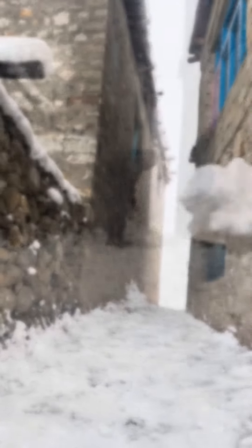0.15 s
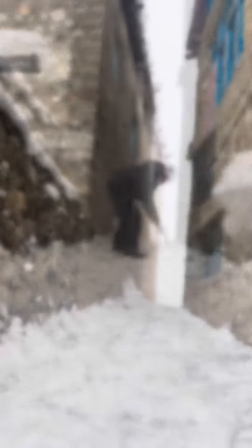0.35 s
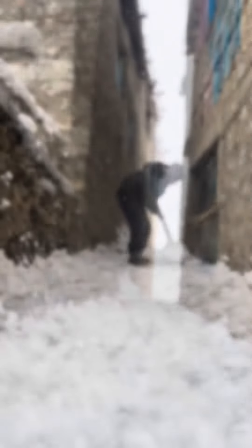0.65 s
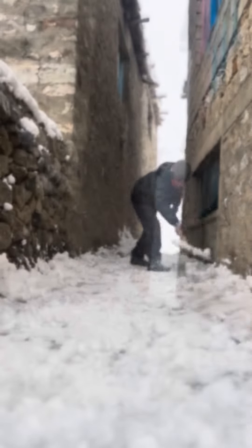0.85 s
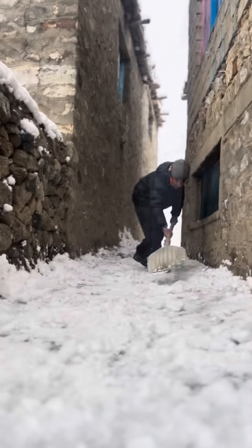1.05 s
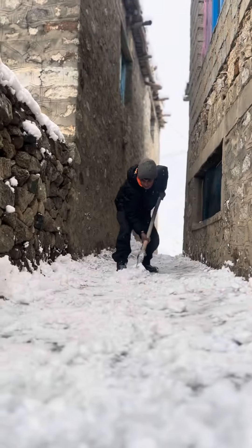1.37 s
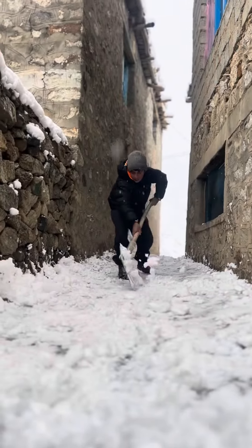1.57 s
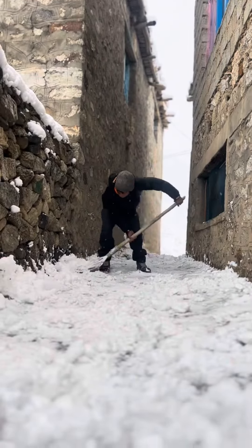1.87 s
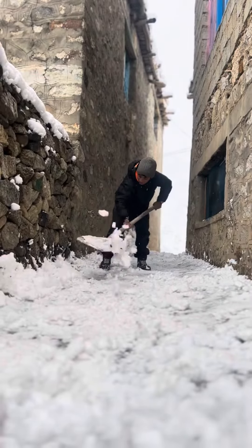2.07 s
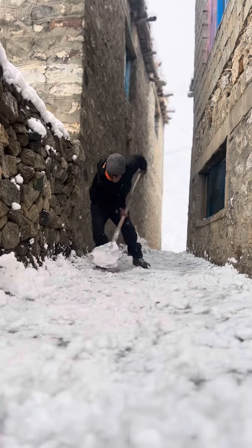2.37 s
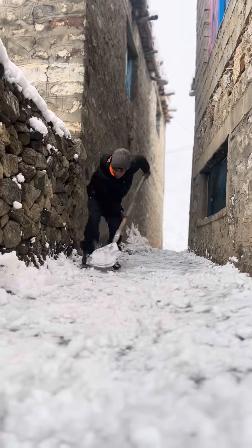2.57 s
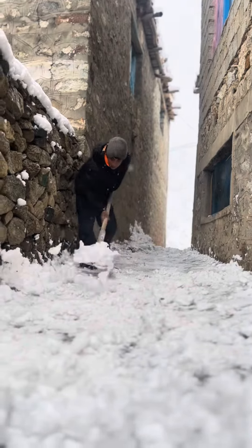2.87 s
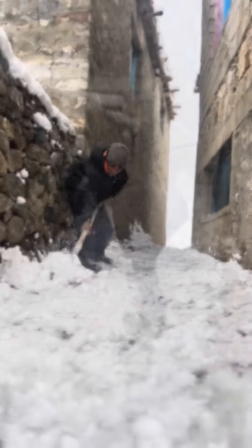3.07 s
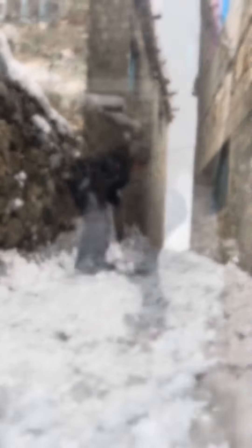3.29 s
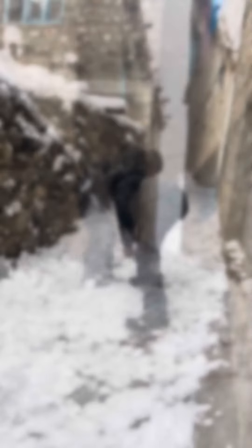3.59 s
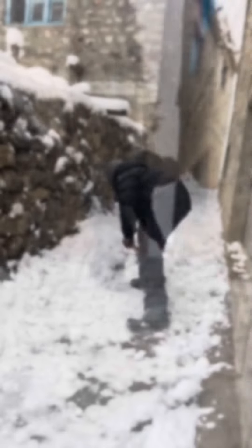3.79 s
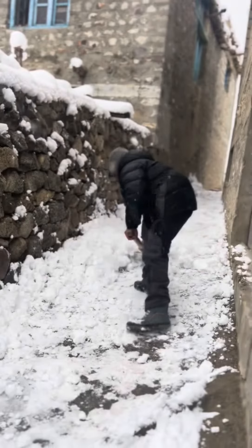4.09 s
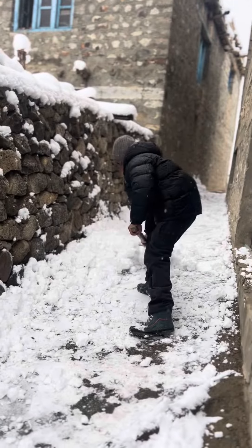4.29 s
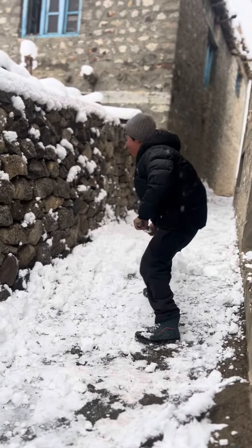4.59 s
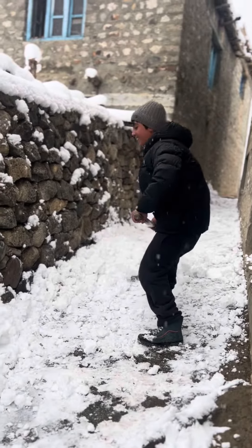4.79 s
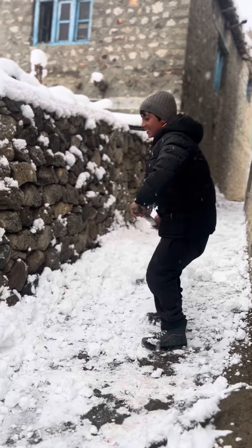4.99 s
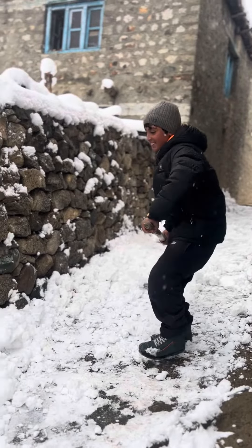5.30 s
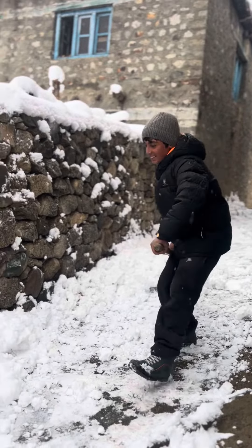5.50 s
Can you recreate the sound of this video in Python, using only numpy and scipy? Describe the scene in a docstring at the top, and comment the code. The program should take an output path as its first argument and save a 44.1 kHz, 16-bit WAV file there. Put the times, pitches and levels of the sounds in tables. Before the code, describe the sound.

Nine short shovel strokes cut through snow at uneven intervals, each a grainy crunch with a faint metallic ring and juddering scrapes. Powder hisses briefly after the first, crumbs tick down, and boots press snow between strokes. The final part is quieter: muffled shuffling, soft heel thuds and nylon rustle. The microphones are near in a snowy lane, with hardly any echo and a soft low hush.

```python
"""A narrow stone lane in fresh snow: a shovel digs and scrapes, with boots shuffling in between.
Each stroke is a short crunch of random grains breaking, with sharper slips where the blade jerks on grit.
Thrown snow lands with soft thuds made of falling sweeps; powder, hush and hiss are shaped noise.
Crumbs tick down, a jacket rustles in bursts of grains, and a far bird whistles in gliding sines."""
import sys
import numpy as np
from scipy import signal
from scipy.fft import rfft, irfft
from scipy.io import wavfile
from scipy.ndimage import uniform_filter1d

SR = 44100
rng = np.random.default_rng(int(sys.argv[2]) if len(sys.argv) > 2 else 0)


def generate_wav(signal):
    """Clip the signal to [-1, 1] and save it as 16-bit WAV at the path in sys.argv[1]."""
    frames = np.transpose(np.atleast_2d(signal))
    scaled = np.clip(frames, -1, 1) * 32767
    pcm = np.round(scaled).astype(np.int16)
    wavfile.write(sys.argv[1], SR, pcm)


N = 249165
TIME = np.arange(N) / SR
RING_SIZE = 4096   # transform size for the ringing bodies, samples


def from_db(db):
    """Decibels to gain."""
    return 10 ** (np.asarray(db) / 20)


def rms_one(x):
    """Scale to unit rms."""
    return x / np.sqrt(np.mean(x ** 2) + 1e-20)


def at_hz(points, hz):
    """Read a spectrum on a log-frequency axis."""
    points = np.array(points)
    return np.interp(np.log(hz), np.log(points[:, 0]), points[:, 1])


def bins(size):
    """Frequencies of a transform of this size, at least 1 Hz."""
    return np.maximum(np.fft.rfftfreq(size, 1 / SR), 1)


def add(out, s, sound):
    """Mix a sound in from time s."""
    i = int(s * SR)
    out[..., i:i + sound.shape[-1]] += sound[..., :N - i]


def noise(spectrum):
    """Noise of unit rms with this spectrum."""
    white = rfft(rng.standard_normal(N))
    return rms_one(irfft(white * from_db(at_hz(spectrum, bins(N))), N))


def drift(span_s):
    """Slow random wander with a spread of 1."""
    size = int(span_s * SR)
    smoothed = uniform_filter1d(rng.standard_normal(N), size)
    return rms_one(uniform_filter1d(smoothed, size))


def response(gain_db):
    """Causal (minimum-phase) ring of a body with this gain at each frequency."""
    cepstrum = irfft(np.log(from_db(gain_db)))
    half = len(cepstrum) // 2
    cepstrum[1:half] *= 2
    cepstrum[half:] = 0
    return irfft(np.exp(rfft(cepstrum)))[:half]


def crunch(body_db, length, start_db, end_db, t60, per_s, spread_db, variety_db, count=3):
    """Grains break at random under pressure, then die away; two rows with unrelated signs feed the microphones."""
    own = np.random.default_rng(rng.integers(2 ** 31))
    knots = np.geomspace(150, 16000, 30)
    # each family of grains rings with slightly different resonances
    colours = own.normal(0, variety_db, (count, len(knots)))
    t = np.arange(int((length + t60) * SR)) / SR
    push_db = np.interp(t, [0, length], [start_db, end_db])
    pressure = from_db(push_db - 60 * np.maximum(t - length, 0) / t60)

    size, birth, family, *signs = own.random((len(t), 5)).T
    strength = from_db(spread_db * np.minimum(-np.log(1 - size), 3))   # a few grains break much louder
    breaks = birth < per_s / SR
    grains = pressure * strength * breaks * np.sign(np.array(signs) - .5)
    sound = 0
    for k, colour in enumerate(colours):
        ring = response(body_db + np.interp(bins(RING_SIZE), knots, colour))
        members = grains * (np.floor(family * count) == k)
        sound = sound + signal.fftconvolve(members, ring[None], axes=-1)
    # give each row the energy of the pressure curve
    return sound * np.sqrt(np.sum(pressure ** 2) / (np.sum(sound ** 2, axis=-1, keepdims=True) + 1e-20))


# spectra of the low rumble, the hush and the thin hiss: f/Hz, relative level/dB
RUMBLE_SPECTRUM = [(20, -1.5), (55, 3.5), (90, -2), (160, -15), (400, -47.5)]
HUSH_SPECTRUM = [(40, -47.5), (90, -18.5), (150, 5), (260, 6), (450, -0.5), (1100, -3), (1600, -14),
                 (2200, -16), (4000, -27), (12000, -63)]
HISS_SPECTRUM = [(500, -45), (2200, -16), (3200, -3), (4200, 0), (6500, -4), (8500, -9), (10500, -22),
                 (13000, -22), (16000, -29)]
# rumble outside its gap, and hush before its wander: t/s, level/dB
RUMBLE_CURVE = [(0, -68), (.21, -40), (.45, -57), (1.0, -54), (2.85, -60), (3.2, -70), (4.85, -70),
                (5.13, -54), (5.3, -63), (5.65, -71)]
HUSH_CURVE = [(0, -59.5), (.2, -53), (.5, -57), (1.2, -59), (2.1, -62.5), (2.35, -60.5), (2.55, -61.5),
              (3.6, -56.5), (4.75, -64), (5.1, -59.5), (5.65, -60.5)]
GAP_START_S, GAP_END_S, GAP_DB = 1.13, 2.83, -46   # the rumble drops by this much in between
HISS_DB, DULL_HISS_DB = -62, -76.5   # before and after the sound turns dull
DULL_FROM_S = 4.2   # the hiss drops around here and later steps are duller
SWITCH_S = .03   # time the background takes to change
HUSH_WAVER_DB, HUSH_WAVER_S = 2.46, 0.065   # rms swing of the hush, and its smoothing span


def air():
    """Low rumble, village hush and thin hiss, all shaped noise; the rumble drops for a while, the hiss later."""
    in_gap = (TIME > GAP_START_S) & (TIME < GAP_END_S)
    is_dull = TIME > DULL_FROM_S - SWITCH_S / 2
    gap, dull = (uniform_filter1d(1.0 * on, size=int(SWITCH_S * SR)) for on in (in_gap, is_dull))
    rumble_db = np.interp(TIME, *np.transpose(RUMBLE_CURVE)) + GAP_DB * gap
    hush_db = np.interp(TIME, *np.transpose(HUSH_CURVE)) + HUSH_WAVER_DB * drift(HUSH_WAVER_S)
    hiss_db = HISS_DB + (DULL_HISS_DB - HISS_DB) * dull
    rumble = from_db(rumble_db) * noise(RUMBLE_SPECTRUM)
    hush = from_db(hush_db) * noise(HUSH_SPECTRUM)
    hiss = from_db(hiss_db) * noise(HISS_SPECTRUM)
    return rumble + hush + hiss


# a clod or heel lands, and smaller lumps follow:
# t/s, landings, peak level of the first sweep/dB, pitch at the swell's peak f/Hz
LANDINGS = [(0.167, 1, -13.5, 187), (.232, 2, -25.5, 185), (.386, 1, -37.5, 92), (.841, 5, -37, 144),
            (4.559, 1, -37, 163), (4.921, 2, -37.5, 181), (5.064, 4, -36.5, 200.6), (5.591, 2, -43, 190)]
PAT_HZ, PAT_S, PAT_DB = 830, .0035, -10   # centre pitch, time to peak, level against the sweep
LUMP_GAP_S, LUMP_LOSS_DB = 0.017, 1   # mean gap and loss from one landing to the next


def thuds(swell_s=0.0116, glide_s=0.0024, sharpness=4.8):
    """A short pat, then a falling sweep: porous snow carries low notes more slowly than high ones."""
    out, t = np.zeros(N), TIME[:SR // 10]
    swell, pat = ((t / peak_s * np.exp(1 - t / peak_s)) ** sharpness for peak_s in (swell_s, PAT_S))
    for s, landings, db, hz in LANDINGS:
        pitch = hz * (glide_s + swell_s) / (glide_s + t)
        for k in range(round(landings)):
            sweep = swell * np.sin(2 * np.pi * (np.cumsum(pitch) / SR + rng.random()))
            contact = pat * np.sin(2 * np.pi * PAT_HZ * rng.uniform(.9, 1.1) * t)
            add(out, s, from_db(db - k * LUMP_LOSS_DB) * (sweep + from_db(PAT_DB) * contact))
            s += LUMP_GAP_S * rng.uniform(.8, 1.2)
    return out


# snow breaking under the blade: f/Hz, relative level/dB
BLADE_SNOW_SPECTRUM = [(40, -39), (100, -44), (170, -9.5), (320, -0.5), (500, -2), (750, -3.5), (1300, -1),
                       (2150, -5.5), (4500, -10), (7000, -14), (9000, -20.5), (11000, -21), (15000, -21)]
# narrow modes of the blade: f/Hz, width f/Hz, level/dB
MODES = [(410, 30, 3.5), (938, 18, 2), (1140, 80, 4.5), (1212, 60, 2.5), (1500, 40, 2), (1650, 30, 1),
         (1867, 37, 4), (2850, 140, 2.5), (2980, 45, -4)]


def blade_at(s, ring_width=0.33):
    """Gain in dB of the loaded blade in the stroke nearest time s: snow, crunch peak, modes and broad ring."""
    *_, crunch_hz, width, crunch_db, ring_hz, ring_db, tilt_db = min(
        BLADE_STROKES, key=lambda row: abs(row[0] - s))
    hz = bins(RING_SIZE)
    octaves = np.log2(hz / crunch_hz)
    peak = crunch_db * np.exp(-(octaves / width) ** 2)
    snow = at_hz(BLADE_SNOW_SPECTRUM, hz) + tilt_db * octaves + peak
    modes = sum(db / (1 + (2 * (hz - mode_hz) / wide) ** 2) for mode_hz, wide, db in MODES)
    ring = ring_db * np.exp(-(np.log2(hz / ring_hz) / ring_width) ** 2)
    return snow + modes + ring


# shovel strokes: t/s, length/s, mid-stroke level/dB, swell over the stroke/dB, crunch f/Hz,
# crunch width/octaves, crunch level/dB, blade ring f/Hz, ring level/dB, tilt/dB per octave
BLADE_STROKES = [(0.234, 0.095, -31, 9, 1100, 0.7, 10, 2630, 7.5, -0.5),
                 (0.684, .12, -33, 0, 1124, 0.76, 9.5, 2680, 10.5, 1),
                 (1.295, 0.12, -33.5, -2, 1065, 0.62, 8.5, 3210, 11, -2),
                 (1.76, 0.11, -49, -21, 1050, 0.79, 6.5, 3240, 2.5, -0.8),
                 (2.59, 0.0593, -34, 23.5, 1270, 0.61, 6, 3230, 5.5, -1.5),
                 (2.97, 0.064, -31, 12, 1350, 0.45, 8, 2980, 6, -.5),
                 (3.33, 0.061, -30.5, -3, 1412, .25, 18.5, 3820, 12.5, -1.9),
                 (3.701, 0.079, -36, -9.5, 1460, 0.46, 10.5, 3280, 7, 0.55),
                 (4.04, 0.094, -30, -1, 1482, 0.49, 13.5, 2980, 9.5, 0.74)]
# the blade catches on grit and judders free in a run of slips:
# t/s, slips, spacing/s, level of the first slip/dB, tilt above 1 kHz/dB per octave
GRIT_CATCHES = [(.232, 2, .026, -25.5, -2), (.297, 2, .033, -22, -4), (.684, 1, 0, -30, -9.5),
                (.697, 1, 0, -13.5, -7.5), (.713, 3, .01, -23.5, -3), (0.7443, 3, .0065, -18.5, -2),
                (.784, 3, .0075, -19.5, -2.5), (1.294, 1, 0, -32, -5), (1.315, 1, 0, -30, 1.5),
                (1.358, 2, .014, -32, -4), (1.399, 2, .008, -32.5, -8), (1.761, 2, .017, -30.5, -2.5),
                (1.814, 3, .0045, -21, 0.5), (2.595, 1, 0, -27.5, -0.5), (2.614, 2, 0.011, -26.5, 1.5),
                (2.628, 3, .0115, -19, -1.5), (2.988, 3, .007, -19.5, 0), (3.031, 1, 0, -24.5, -1),
                (3.326, 2, .026, -24.5, -2), (3.379, 1, 0, -16.5, 3), (3.729, 1, 0, -22.5, -1),
                (3.753, 2, .007, -17, -0.5), (4.041, 3, .0125, -18.5, -1), (4.083, 4, .0145, -14.5, -1.5)]
ENTRY_S, ENTRY_DB, ENTRY_RISE_DB = 0.011, -22, 11.5   # the edge sinks in softly just before each stroke
RELEASE_S = 0.064   # the crunch falls by 60 dB once the push ends
SLIP_S, SLIP_LOSS_DB = 0.0027, 2   # each slip of a run is weaker than the one before
SLIP_T60_S = .021   # a slip, or the entry, falls by 60 dB in this time
GRIP_DB, GRIP_S = 2.2, .004   # the blade sticks and gives: rms swing and pace of the ploughing level


def shovel():
    """The edge sinks in and ploughs unevenly through coarse grains, with brief dense bursts where it slips."""
    plough, grit = np.zeros((2, N)), np.zeros((2, N))
    octaves = np.log2(np.maximum(bins(RING_SIZE) / 1000, 1))
    coarse = dict(per_s=1900, spread_db=4.3, variety_db=2.5)
    dense = dict(per_s=9000, spread_db=2, variety_db=3.5)
    for s, length, db, swell_db, *_ in BLADE_STROKES:
        start_db, end_db = db - swell_db / 2, db + swell_db / 2
        touch_db = start_db + ENTRY_DB
        entry = crunch(blade_at(s), ENTRY_S, touch_db, touch_db + ENTRY_RISE_DB, SLIP_T60_S, **coarse)
        add(plough, s - ENTRY_S, entry)
        add(plough, s, crunch(blade_at(s), length, start_db, end_db, RELEASE_S, **coarse))
    for s, slips, spacing, db, tilt_db in GRIT_CATCHES:
        for k in range(max(round(slips), 1)):
            slip_db = db - k * SLIP_LOSS_DB
            body_db = blade_at(s) + tilt_db * octaves
            add(grit, s + k * spacing, crunch(body_db, SLIP_S, slip_db, slip_db, SLIP_T60_S, **dense))
    grip = rms_one(from_db(GRIP_DB * drift(GRIP_S)))
    return plough * grip + grit


# snow breaking under a boot: f/Hz, relative level/dB
BOOT_SNOW_SPECTRUM = [(40, -38), (100, -33.5), (200, 2), (500, 2), (800, 3), (1300, 3), (2200, -9.5),
                      (3200, -10.5), (6000, -19.5), (11000, -25), (15000, -23.5)]
# colour added to the last, duller steps: f/Hz, relative level/dB
DULL_COLOUR = [(3000, 28), (7000, -31), (10000, -22), (13000, -37)]


def trodden_at(s, tilt_db):
    """Gain in dB of the snow on the ground at time s, brighter or darker above the mids."""
    hz = bins(RING_SIZE)
    tilt = tilt_db * np.log2(1 + (hz / 900) ** 2) / 2
    return at_hz(BOOT_SNOW_SPECTRUM, hz) + tilt + (s > DULL_FROM_S) * at_hz(DULL_COLOUR, hz)


CRUMBS_PER_S, CRUMB_DB, CRUMB_SPREAD_DB = 1.6, -50.5, 4   # rate, mid level, spread either way


def crumbs(tilt_db=-4, length=0.0073, t60=0.033):
    """While the digging lasts, bits of snow drop off the blade, one faint tick at a random time in each slot."""
    out = np.zeros((2, N))
    own = np.random.default_rng(rng.integers(2 ** 31))
    tick = dict(per_s=2600, spread_db=4, variety_db=2.5)
    slots = np.arange(BLADE_STROKES[0][0], BLADE_STROKES[-1][0], 1 / CRUMBS_PER_S)[:-1]
    for slot in slots:
        s = slot + own.random() / CRUMBS_PER_S
        db = CRUMB_DB + CRUMB_SPREAD_DB * own.uniform(-1, 1)
        add(out, s, crunch(trodden_at(s, tilt_db), length, db, db, t60, **tick))
    return out


# loose powder sliding after a stroke: t/s, length/s, peak level/dB
POWDER_SLIDES = [(0.332, 0.19, -53), (1.036, 0.1, -66.5)]
# spectrum of the sliding powder: f/Hz, relative level/dB
POWDER_SPECTRUM = [(2500, 4), (4800, 0), (5900, 17.5), (7000, 1), (10000, 1.5), (15000, -10)]


def powder():
    """Fine snow hisses softly as it slides and settles: noise under smooth swells."""
    flow = np.zeros(N)
    for s, length, db in POWDER_SLIDES:
        add(flow, s, from_db(db) * np.hanning(int(length * SR)))
    return flow * noise(POWDER_SPECTRUM)


# boots pressing the snow: t/s, starting level/dB, length/s, tilt/dB per octave
BOOT_PRESSES = [(.991, -27.5, 0.013, 0), (1.245, -43, 0.018, -3.5), (1.613, -43.5, .0065, -6),
                (1.901, -48.5, .01, -2), (2.186, -34.5, 0.0038, -2), (2.2, -40, 0.02, 0),
                (2.245, -45.5, 0.039, 1.5), (2.355, -31.5, 0.0054, -1), (2.426, -50.5, 0.029, -32),
                (2.705, -45.5, .036, -24), (2.745, -28.5, 0.0065, 0), (2.868, -47.5, 0.025, -12.5),
                (3.213, -41.5, 0.0069, -0.5), (3.466, -42.5, .015, -2), (3.607, -36, 0.0077, 1),
                (4.555, -32, 0.0084, 6.5), (4.947, -42, .006, 2), (5.059, -44.5, 0.071, -19),
                (5.095, -40.5, .005, 19), (5.118, -45.5, 0.00616, -1), (5.189, -53, 0.0077, 18),
                (5.306, -41, 0.016, -2.5), (5.334, -52, 0.0093, -4), (5.36, -46.5, .008, 1),
                (5.38, -49, 0.029, -5), (5.466, -43.5, 0.019, -1.5), (5.587, -42, 0.016, -3)]
SETTLE_S, SETTLE_DB = 0.053, -58.5   # the packed snow creaks on under the boot's weight


def boots(fade_db=5, t60=0.035, settle_tilt_db=-5):
    """Small, dry crunches underfoot, each followed by sparse creaks as the snow settles."""
    out = np.zeros((2, N))
    press = dict(per_s=1600, spread_db=4.3, variety_db=2.5)
    creak = dict(per_s=500, spread_db=5, variety_db=2.5)
    for s, db, length, tilt_db in BOOT_PRESSES:
        add(out, s, crunch(trodden_at(s, tilt_db), length, db, db - fade_db, t60, **press))
        packed_db = trodden_at(s, settle_tilt_db)
        settling = crunch(packed_db, SETTLE_S, SETTLE_DB, SETTLE_DB - fade_db, t60, **creak)
        add(out, s + length, settling)
    return out


# far bird: t/s, length/s, start f/Hz, end f/Hz, peak level/dB
BIRD_NOTES = [(1.407, 0.1, 1550, 1560, -56), (1.492, 0.071, 1420, 1440, -55),
              (1.544, 0.077, 1694, 1770, -56.5), (1.685, .05, 1590, 1630, -63),
              (2.136, 0.063, 1420, 1414, -56.5)]


def bird():
    """Faint whistled notes: gliding sines with a random wobble in pitch."""
    out = np.zeros(N)
    wobble = .03 * rms_one(uniform_filter1d(rng.standard_normal(N), size=120))
    for s, length, start_hz, end_hz, db in BIRD_NOTES:
        n = int(length * SR)
        pitch = np.linspace(start_hz, end_hz, n) * (1 + wobble[int(s * SR):][:n])
        add(out, s, from_db(db) * np.hanning(n) * np.sin(2 * np.pi * np.cumsum(pitch) / SR))
    return out


# the padded jacket rustling: t/s, length/s, level/dB
JACKET_RUSTLES = [(4.537, 0.16, -63), (4.889, .12, -55.5), (5.064, 0.019, -57.5), (5.306, 0.12, -67),
                  (5.46, 0.058, -62), (5.581, 0.036, -56)]
# ring of the nylon: f/Hz, relative level/dB
NYLON_SPECTRUM = [(300, -15), (1200, 7), (2100, 9.5), (3300, 5), (5000, -2.5), (8000, -6.5), (11000, -12.5),
                  (15000, -52)]
RUSTLE_RISE_S, RUSTLE_RISE_DB = .035, 18   # each rustle swells in


def jacket():
    """Creases in the nylon snap over as the body moves."""
    out = np.zeros((2, N))
    nylon_db = at_hz(NYLON_SPECTRUM, bins(RING_SIZE))
    creases = dict(per_s=1500, spread_db=4.7, variety_db=2.5)
    for s, length, db in JACKET_RUSTLES:
        rise = crunch(nylon_db, RUSTLE_RISE_S, db - RUSTLE_RISE_DB, db, t60=0.011, **creases)
        add(out, s - RUSTLE_RISE_S, rise)
        add(out, s, crunch(nylon_db, length, db, db, t60=0.43, **creases))
    return out


def scatter(x, t60, delay):
    """Dense reflections from rough stone: decaying noise with the energy of the direct sound."""
    t = TIME[:SR // 2]
    echoes = rng.standard_normal(len(t)) * from_db(-60 * t / t60) * (t >= delay)
    return signal.fftconvolve(x, echoes / np.sqrt(np.sum(echoes ** 2)))[:N]


# balance of the two microphones: f/Hz, left minus right level/dB
MIC_BALANCE = [(200, 0), (700, 1), (1300, 1.1), (2400, 4), (4400, 6.5), (8000, 2), (15000, .5)]
# likeness of the two microphones: f/Hz, correlation (1 alike, 0 unrelated, -1 opposed)
MIC_LIKENESS = [(300, .97), (700, .96), (1400, .94), (3100, .8), (6800, .55), (9000, 0), (11500, -.7),
                (15000, .1)]


def microphones(common, apart):
    """Both microphones hear nearly the same bass; they part in the treble, and the right one is shaded."""
    hz = bins(N)
    alike = np.clip(at_hz(MIC_LIKENESS, hz), -.999, .999)
    lean_db = at_hz(MIC_BALANCE, hz) / 2
    sides = np.array([[1], [-1]])
    shared = np.sqrt((1 + alike) / 2) * rfft(common)
    differing = sides * np.sqrt((1 - alike) / 2) * rfft(apart)
    return irfft((shared + differing) * from_db(sides * lean_db), N)


ECHO_DB = -29   # the stone walls, under the direct sound


def scene():
    """Work in the lane; the snow swallows most of the echo."""
    work = shovel() + boots() + jacket() + crumbs()
    echoes = np.array([scatter(row, t60=.1, delay=.003) for row in work])
    # each row gets its own powder and air
    common, apart = (row + powder() + air() for row in work + from_db(ECHO_DB) * echoes)
    return microphones(common + thuds() + bird(), apart)


CUTOFF_HZ = 15900


def record(dry):
    """The top is cut steeply by an elliptic low-pass."""
    lowpass = signal.ellip(10, .1, 80, CUTOFF_HZ, fs=SR, output="sos")   # order, ripple dB, stopband dB
    return signal.sosfilt(lowpass, dry)


dry = scene()
out = record(dry)
generate_wav(out)
```